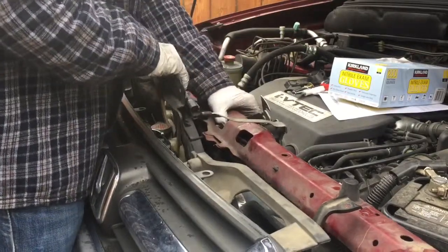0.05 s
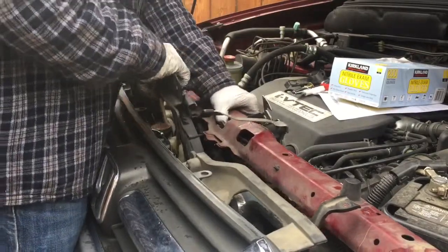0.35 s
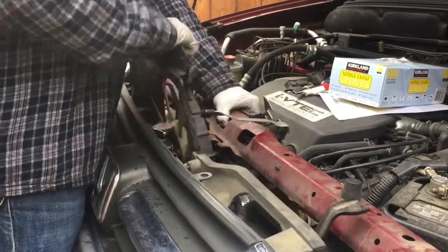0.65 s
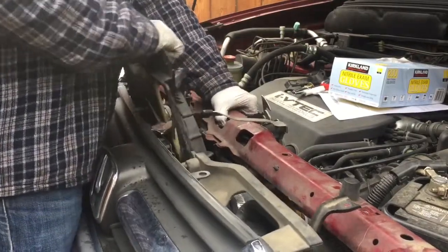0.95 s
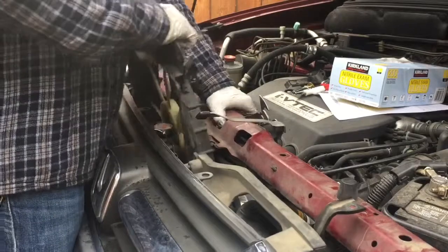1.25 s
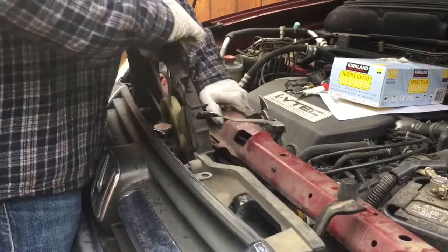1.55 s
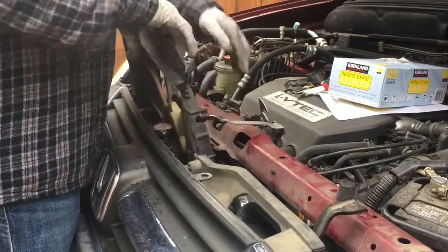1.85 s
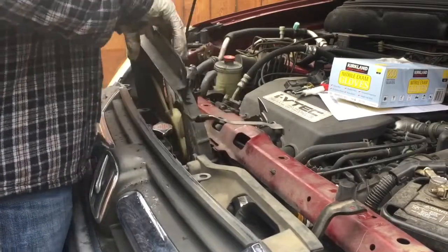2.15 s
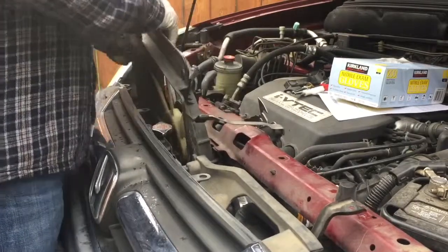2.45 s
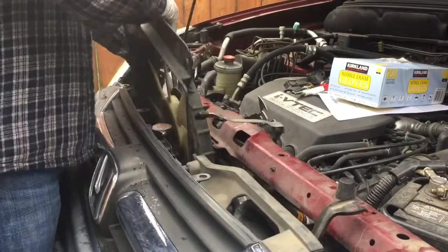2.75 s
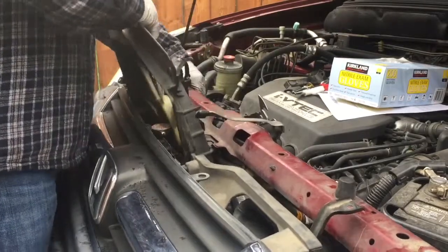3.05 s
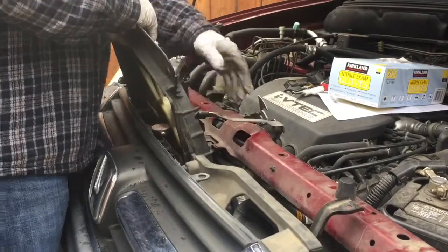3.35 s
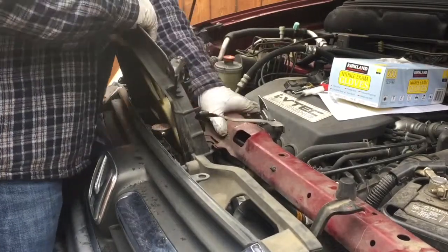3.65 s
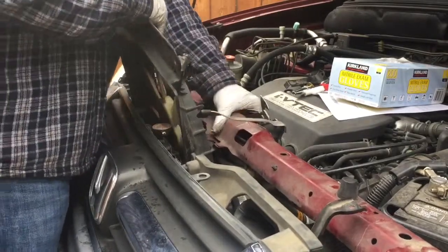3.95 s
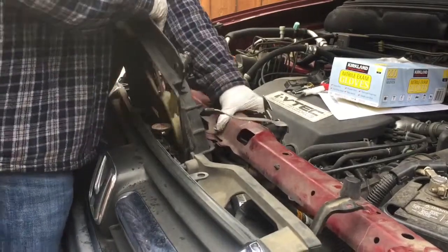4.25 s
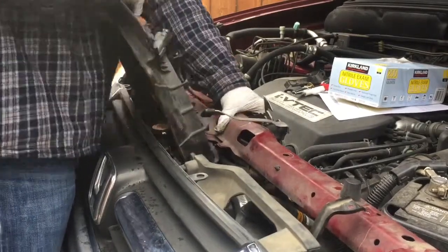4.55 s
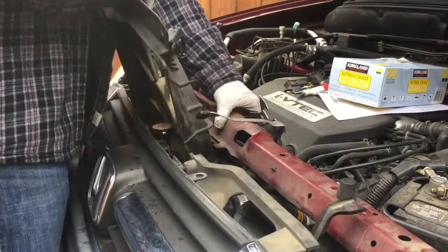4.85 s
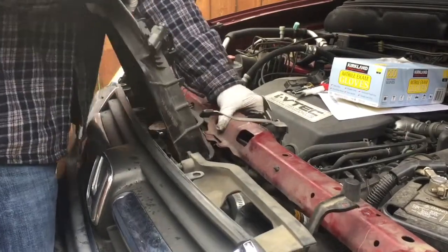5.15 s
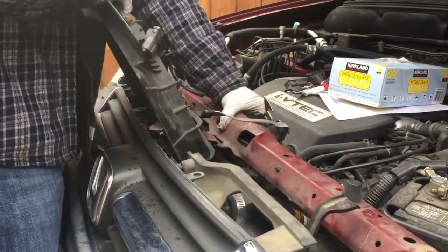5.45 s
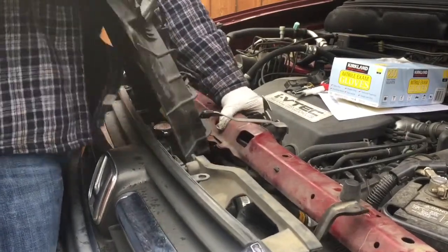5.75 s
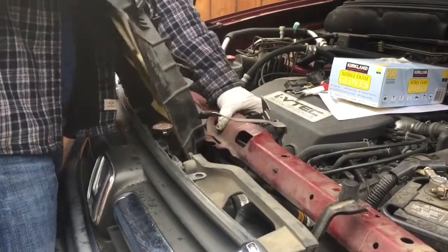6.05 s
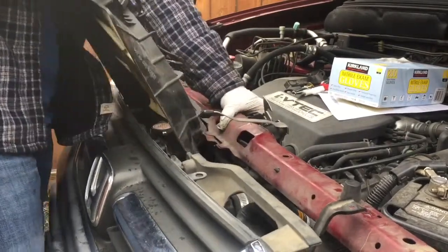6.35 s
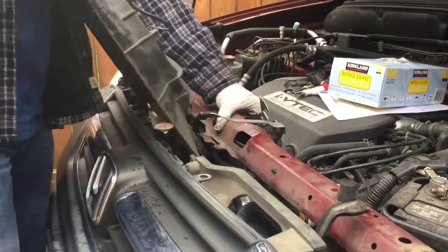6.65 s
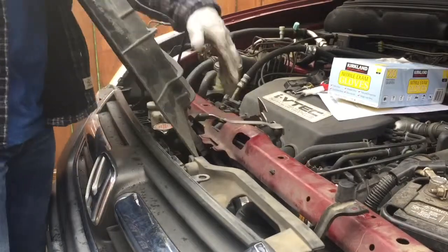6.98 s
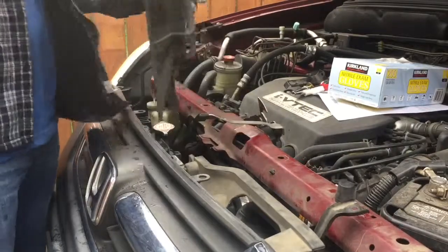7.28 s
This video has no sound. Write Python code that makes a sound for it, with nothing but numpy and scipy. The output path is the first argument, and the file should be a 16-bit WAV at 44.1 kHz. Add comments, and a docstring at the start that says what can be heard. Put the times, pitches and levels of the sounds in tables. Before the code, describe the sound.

A plastic fan shroud scrapes and knocks against metal in short bursts as it is worked out of a car's engine bay.

```python
"""Short scrapes and knocks of plastic on metal in a quiet garage: a fan shroud is worked side to side
and up out of a car's engine bay. Its edge sticks and slips in strokes and hits the metal around it.
The big panel booms after each shove, and a thin metal part rings when it is brushed.
Sleeves and gloves rustle over a faint room rumble."""
import sys
import numpy as np
from scipy import signal
from scipy.fft import rfft, irfft, next_fast_len
from scipy.io import wavfile
from scipy.ndimage import uniform_filter1d, map_coordinates

SR = 44100
rng = np.random.default_rng(int(sys.argv[2]) if len(sys.argv) > 2 else 0)


def wav_record(signal):
    """Record a signal, one row per channel, as 16-bit PCM in the file named by sys.argv[1]."""
    frames = np.transpose(np.atleast_2d(signal))
    bounded = np.clip(frames, -1, 1)
    # unit amplitude maps onto the largest positive 16-bit level
    quanta = np.round(bounded * 32767).astype(np.int16)
    wavfile.write(sys.argv[1], SR, quanta)


N = 327132
TIME_S = np.arange(N) / SR
AGE_S = np.arange(SR // 2) / SR  # time within one event
TOP_HZ = 16200
MID_HZ = 1510  # pitch of an average spot on the shroud

# Panel boom. Each row: frequency in Hz, relative level in dB.
PANEL_SPECTRUM = [(35, -38), (60, -19), (110, -1), (200, 0.5), (300, -4), (450, -3.5), (700, -13.5),
                  (1400, -50), (4000, -48)]
# Contact ticks and grit. Each row: frequency in Hz, relative level in dB.
TICK_SPECTRUM = [(1500, -26.5), (3500, 2.5), (6000, 0), (9300, -0.5), (10500, -2), (12000, 1), (16000, -15)]


def stroke_forces(push_power=1.94, grit_power=0.99, panel_lag_s=0.018):
    """Each shove builds, holds and dies away. Returns the drives of scrape, grit and lagging panel."""
    # Each row: start, attack, hold and release t60 in seconds, scrape drive in dB,
    # grit and boom drives in dB re the scrape drive.
    strokes = [(0.137, 0.018, 0.022, 0.19, -36.5, -9, -2.5), (0.395, 0.066, 0.058, 0.088, -50.5, -7.5, 1.5),
               (0.636, 0.087, 0.018, 0.18, -31, -8, -7), (1.016, 0.04, 0.027, 0.24, -27.5, -12.5, -11.5),
               (1.169, 0.048, 0.018, 0.364, -42, -5.5, -1), (1.348, 0.012, 0.053, 0.1, -50, -13.5, 4),
               (1.663, 0.013, 0.076, 0.084, -51.5, -7, -0.5), (1.867, 0.042, 0.0076, 0.16, -47, -15, -0.5),
               (2.019, 0.028, 0.007, 0.047, -46, -9, 3.5), (2.775, 0.076, 0.037, 0.11, -28, -6.5, -9.5),
               (3.105, 0.032, 0.13, 0.16, -65.5, -2, -3.5), (4.057, 0.033, 0.0082, 0.047, -42, -9, -4.5),
               (4.212, 0.016, 0.0057, 0.056, -41.5, -2.5, -5.5),
               (4.459, 0.03, 0.017, 0.088, -45, -37.5, -3), (4.519, 0.015, 0.046, 0.384, -30.5, -9, -6),
               (4.985, 0.043, 0.112, .2, -44, -11, -6), (5.677, .02, 0.027, .1, -34.5, -5, 1),
               (5.726, 0.014, 0.024, .27, -29.5, -6.5, -6), (5.909, 0.039, 0.029, 0.5, -45, -4, 0),
               (6.235, 0.078, 0.017, 0.18, -40, -3.5, -4.5), (6.446, 0.041, 0.035, 0.33, -39.5, -6.5, 0.5),
               (6.829, 0.018, 0.0044, .25, -47, -4, -4.5), (7.065, 0.062, 0.011, 0.42, -55, -17, -8)]
    scrape, grit, boom = np.zeros((3, N))
    for start_s, attack_s, hold_s, release_s, db, grit_db, boom_db in strokes:
        t = TIME_S - start_s
        build = np.clip(t / attack_s, 0, 1) ** push_power
        force = build * np.exp(-np.log(1000) * np.maximum(t - attack_s - hold_s, 0) / release_s)
        scrape += amp(db) * force
        grit += amp(db + grit_db) * force ** grit_power
        boom += amp(db + boom_db) * force
    pole = np.exp(-1 / (panel_lag_s * SR))
    return scrape, grit, signal.lfilter([1 - pole], [1, -pole], boom)


def scrapes(scrape, grit, boom):
    """The edge judders over metal: coarse slips in the plastic, fine grit on top, the panel below."""
    catches = judder(rate_hz=130, depth_db=4.6)
    coarse = slips(per_s=3000, pitch_hz=1535, spread=0.2506, decay_cycles=3.7, scatter_db=11.5)
    coarse = wander(coarse, depth_db=3)
    fine = slips(per_s=3000, pitch_hz=6360, spread=0.62, decay_cycles=0.24, scatter_db=8.5)
    fine = wander(coloured(fine, TICK_SPECTRUM), depth_db=3.5)
    panel = wander(coloured(rng.standard_normal(N), PANEL_SPECTRUM), depth_db=3.5, bins=3)
    return catches * (amp(3) * scrape * coarse + amp(0.5) * grit * fine) + amp(0.5) * boom * panel


def slips(per_s, pitch_hz, spread, decay_cycles, scatter_db):
    """Stick-slip at rms 1: irregular tiny jolts, each a damped sine of its own pitch and size."""
    count = int(per_s * N / SR)
    when, pitch, size = np.random.default_rng(rng.integers(2 ** 31)).random((count, 3)).T
    log_offset = spread * np.log(pitch / (1 - pitch))
    hz = np.clip(pitch_hz * np.exp(log_offset), 300, TOP_HZ)[:, None]
    t = AGE_S[:SR // 100]
    gain = amp(scatter_db * size)[:, None] * np.sqrt(hz)
    jolts = gain * np.sin(2 * np.pi * hz * t) * np.exp(-hz * t / decay_cycles)
    index = (when * N).astype(int)[:, None] + np.arange(len(t))
    return unit(np.bincount(index.ravel(), jolts.ravel(), N)[:N])


def judder(rate_hz, depth_db):
    """The edge catches and lets go at an uneven pace: a peaky gain of rms 1."""
    knots = rng.standard_normal(int(N * rate_hz / SR) + 4)
    return unit(amp(depth_db * np.tanh(map_coordinates(knots, [TIME_S * rate_hz]))))


def wander(x, depth_db, bins=5, frames=16):
    """The contact point wanders, so different resonances stand out from moment to moment."""
    spectra = signal.stft(x, nperseg=1024)[2]
    field = uniform_filter1d(rng.standard_normal(spectra.shape), bins, axis=0)
    field = uniform_filter1d(field, frames, axis=1)
    return unit(signal.istft(spectra * amp(depth_db * unit(field)), nperseg=1024)[1][:N])


def knocks(scrape, rattle_tries_per_s=22, rattle_db=-12.5):
    """The shroud hits metal at a different spot each time, and rattles by chance while it scrapes."""
    # Each row: start in seconds, strength in dB, pitch in Hz, spread in octaves, tick sharpness in dB.
    blows = [(0.0034, -34, 3440, 0.27, -10), (0.15, -32, 2925, 0.093, -8.5), (0.1654, -33, 2920, .47, -15),
             (0.4287, -46, 2420, 0.37, -42), (0.3283, -58.5, 1070, 0.4, -31), (0.523, -44, 1523, 0.41, -34),
             (0.6749, -36, 1930, 1.14, -29), (0.7134, -33, 2020, 1.2, -18), (0.728, -41, 1840, 1, -12),
             (0.7801, -39, 2620, 0.83, -10), (1.0357, -31, 1280, 0.57, -31.5),
             (1.047, -25.5, 1794, 0.43, -19), (1.072, -24.5, 1700, 0.41, -15.5),
             (1.1912, -42.5, 3000, 0.73, -12), (1.201, -36.5, 2120, 0.48, -34),
             (1.216, -29.5, 857, 0.44, -42), (1.3449, -41.5, 710, 0.63, -44),
             (1.3652, -38.5, 1640, 0.25, -34), (1.4093, -43, 1010, 0.48, -13),
             (1.4644, -48, 1290, 0.36, -45), (1.554, -40.5, 1820, 0.37, -20.5),
             (1.691, -39.5, 577, 0.1, -21), (1.7147, -41, 1580, 0.29, -29), (1.7655, -45, 3970, 0.8, -6),
             (1.8762, -55, 3460, 1.8, 1.5), (2.026, -48.5, 795, 0.18, -35), (2.0443, -44.5, 960, 0.67, -35),
             (2.5737, -35, 2560, 0.41, -9), (2.5964, -43, 2460, 0.44, -34), (2.8187, -39, 2220, .94, -6),
             (2.8476, -25, 1512, 0.41, -22), (2.8694, -33, 1816, 0.33, -3.5), (3.13, -56, 1380, 0.53, -25),
             (3.2596, -53.5, 3080, 0.18, -18), (4.2374, -38.5, 2850, 0.84, -23),
             (4.2951, -61.5, 4400, 1.2, 7.5), (4.434, -48.5, 920, 0.53, -55), (4.5269, -20, 1590, 0.46, -9),
             (4.549, -34.5, 2110, 1.3, -11), (4.578, -32, 3380, .65, -9), (4.647, -32, 2700, 1.46, -9),
             (4.7084, -38, 1180, 0.66, -21), (4.802, -53.5, 1090, 0.76, -25), (4.933, -57, 2020, 0.21, -10),
             (4.972, -54.5, 1346, 0.32, -33), (5.0205, -38.5, 1610, 0.65, -25), (5.096, -32, 2380, 0.24, 0),
             (5.1019, -27.5, 1774, 0.46, -35), (5.4885, -45.5, 2660, 0.91, -7),
             (5.6885, -43.5, 3290, 1.1, 3.5), (5.7366, -26, 2620, 1.2, -4.5),
             (5.7569, -30.5, 1646, 1.3, -19), (5.9626, -33, 1266, 0.36, -13.5),
             (5.997, -32, 1413, 0.93, -20), (6.2705, -44, 1792, 0.57, -26),
             (6.3434, -35.5, 1350, 0.95, -35), (6.5, -36.5, 1695, 0.14, -24),
             (6.5373, -33, 3300, 0.52, -12), (6.6281, -22, 1510, 0.71, -13.5),
             (6.651, -39.5, 2180, 0.7, -31), (6.8529, -42, 1500, 0.42, -12.5),
             (7.2114, -37, 1530, 0.53, -9), (7.2329, -45, 1980, 0.82, -23),
             (7.3119, -50.5, 1080, 0.23, -42)]
    track = np.zeros(N)
    for start_s, *blow in blows:
        add(track, start_s, knock(*blow))
    for when, spot in rng.random((int(rattle_tries_per_s * N / SR), 2)):
        force = scrape[int(when * N)]
        if force > amp(-60):
            pitch_hz = MID_HZ * 2 ** (2 * spot - 1)  # within an octave either way
            rattle = knock(20 * np.log10(force) + rattle_db, pitch_hz, spread_oct=0.92, tick_db=-49)
            add(track, when * N / SR, rattle)
    return track


def knock(db, pitch_hz, spread_oct, tick_db, ripple_db=4, spacing_hz=130, heavy_db=-32):
    """One blow: crowded, quickly damped plastic modes, a contact tick, then the slower panel."""
    mode_noise, tick_noise, panel_noise, bumps = rng.standard_normal((4, len(AGE_S)))

    def spot_response(hz):
        """A band around the pitch; each spot favours its own few resonances."""
        band = (1 + (np.log2((hz + 1) / pitch_hz) / (2.58 * spread_oct)) ** 2) ** -2
        ripple = np.tanh(np.interp(hz / spacing_hz, np.arange(len(bumps)), bumps))
        return band / np.sqrt(hz + 200) * amp(ripple_db * ripple)

    modes = filtered(mode_noise, spot_response) * fade(t60_s=0.047)
    modes /= np.std(modes[:SR // 100])
    tick = amp(tick_db + 13) * coloured(tick_noise, TICK_SPECTRUM) * fade(t60_s=0.019)
    # stiff, high-pitched spots flex the panel less, heavy blows more
    boom_db = -10.5 - 9 * np.log2(pitch_hz / MID_HZ) + 0.2 * (db - heavy_db)
    panel = amp(boom_db) * coloured(panel_noise, PANEL_SPECTRUM) * fade(t60_s=0.13) * rise(tau_s=0.013)
    contact_s = 0.00035 * amp(-0.26 * tick_db)  # the duller the tick, the longer the contact
    onset = rise(contact_s) * (1 + contact_s / 0.0028)
    return amp(db + 2) * ((modes + tick) * onset + panel)


def thuds():
    """Heavy shoves flex the whole shroud: a deep, short shudder."""
    # Each row: start in seconds, level in dB before the envelope, pitch in Hz.
    shoves = [(2.866, -32, 272), (4.552, -36.5, 90), (5.742, -37, 300)]
    track = np.zeros(N)
    for start_s, db, pitch_hz in shoves:
        noise = rng.standard_normal(len(AGE_S))
        shudder = unit(filtered(noise, lambda hz: hz ** 2 / (1 + (hz / pitch_hz) ** 6)))
        add(track, start_s, amp(db) * shudder * fade(t60_s=0.25) * rise(tau_s=0.0053))
    return track


def shroud_in_bay(x):
    """The shroud's broad resonances and the engine bay colour the plastic's sound, and everything below about
    55 Hz falls away steeply."""
    # Each row: centre in Hz, width in Hz, gain in dB re the direct path.
    resonances = [(237, 109, -3.5), (1314, 68, -3), (1543, 64, -3)]
    # Each row: frequency in Hz, gain in dB.
    bay_response = [(22, -47), (55, -3), (500, -0.5), (1300, -4), (3000, -3), (9000, -1.5), (10500, -6.5),
                    (16000, -3)]

    def response(hz):
        peaks = sum(amp(db) * 1j * hz * width_hz / (centre_hz ** 2 - hz ** 2 + 1j * hz * width_hz)
                    for centre_hz, width_hz, db in resonances)
        return (1 + peaks) * amp(along(bay_response, hz))

    return filtered(x, response)


def contact_hardness(x, edge_hz=10000):
    """Harder contact puts more into the top octave; it softens as the shroud comes free."""
    # Each row: time in seconds, gain above edge_hz in dB.
    hardness = [(0, 1), (1.2, -0.5), (2.8, -3), (4.5, -0.5), (5.2, 0), (6.2, -10.5), (7.3, -15)]
    top = filtered(x, lambda hz: 1 - 1 / (1 + (hz / edge_hz) ** 10))
    top_gain = amp(np.interp(TIME_S, *np.transpose(hardness)))
    return x + (top_gain - 1) * top


def metal_ring(rub_top_hz=11100, tilt_db_per_oct=-0.5):
    """A brief gritty rub is heard and rings the thin metal part, at new mode strengths each time."""
    # Each row: start in seconds, strength in dB, length in seconds.
    touches = [(0.197, -31, 0.04), (1.284, -31.5, 0.026), (1.721, -37.5, 0.07), (1.9376, -35.5, 0.017),
               (2.054, -36, 0.02), (4.686, -32, 0.02), (4.824, -39, 0.026), (5.153, -30, 0.02),
               (5.534, -46, 0.0069), (5.703, -33, 0.027), (5.95, -28, 0.034), (6.095, -43, 0.0045),
               (6.293, -28.5, 0.044), (6.464, -24.5, 0.046), (6.517, -50, 0.031)]
    # Each row: frequency in Hz, relative level in dB, t60 in seconds.
    modes = [(2020, 0, .16), (2085, -4, .12), (2850, -6, .1), (4059, -8, .05), (4600, -9, .05),
             (5560, -7, .04), (5959, -5, .1), (7009, -3, .07), (8100, -8, .03), (9480, -11, .05)]
    track = np.zeros(N)
    for start_s, db, length_s in touches:
        rub = rng.standard_normal(len(AGE_S)) * np.exp(-(AGE_S / length_s) ** 2)
        scuff = filtered(rub * rise(tau_s=0.005), lambda hz: 1 / (1 + (hz / rub_top_hz) ** 4))
        add(track, start_s, amp(db - 18) * scuff)
        for hz, mode_db, t60_s in modes:
            ring = signal.fftconvolve(rub, fade(t60_s) * np.sin(2 * np.pi * hz * AGE_S))[:len(AGE_S)]
            tilt_db = tilt_db_per_oct * np.log2(hz / modes[0][0])  # soft plastic drives high modes less
            add(track, start_s, amp(db + mode_db + tilt_db + rng.normal(0, 2) - 34) * unit(ring))
    return track


def garage_echo(x, patterns=24):
    """Short diffuse echo of bay, bonnet and walls; its pattern changes as the shroud moves."""
    # Each row: frequency in Hz, t60 in seconds.
    decay_times = [(100, 0.5), (300, 0.32), (1000, 0.21), (3000, 0.14), (7000, 0.093), (15000, 0.11)]
    wet = np.zeros(N)
    for span in np.array_split(np.arange(N), patterns):
        hz, t, spectra = signal.stft(rng.standard_normal(len(AGE_S)), SR, nperseg=256)
        decay = np.exp(-np.log(1000) * t / along(decay_times, hz)[:, None])
        tail = signal.istft(spectra * decay, SR, nperseg=256)[1][:len(AGE_S)] * rise(tau_s=0.00098)
        add(wet, span[0] / SR, signal.fftconvolve(x[span], tail / np.linalg.norm(tail)))
    return wet


def cloth_rustle():
    """Sleeves and gloves brush in tiny slips as the arms move."""
    # Each row: centre in seconds, peak level in dB, half-width in seconds.
    brushes = [(2.42, -75.5, 0.29), (3.228, -69, 0.03), (3.59, -74, 0.087), (3.801, -55, 0.014),
               (3.892, -68.5, 0.041)]
    # Each row: frequency in Hz, relative level in dB.
    cloth_spectrum = [(500, -33), (2500, -5), (8000, 8), (11000, 8), (16000, 8)]
    fibres = slips(per_s=1200, pitch_hz=5600, spread=0.3, decay_cycles=0.86, scatter_db=20)
    envelope = sum(amp(db) * np.exp(-((TIME_S - at_s) / half_s) ** 2) for at_s, db, half_s in brushes)
    return envelope * coloured(fibres, cloth_spectrum)


def room_rumble():
    """Steady low rumble with faint hiss."""
    # Each row: frequency in Hz, relative level in dB.
    air_spectrum = [(15, -55.5), (25, -39), (42, -19), (64, -0.5), (114, -14), (153, -13), (503, -21),
                    (659, -19.5), (775, -22), (988, -17.5), (1400, -23.5), (4030, -31), (5880, -33.5),
                    (14400, -40), (16000, -43)]
    return amp(-61.5) * coloured(rng.standard_normal(N), air_spectrum)


def amp(db):
    """Decibels to gain."""
    return 10 ** (np.asarray(db) / 20)


def unit(x):
    """Scale to rms 1."""
    return x / np.sqrt(np.mean(x ** 2) + 1e-20)


def along(points, hz):
    """Interpolate (Hz, value) points on a log frequency axis."""
    points_hz, values = np.transpose(points)
    return np.interp(np.log(hz + 1), np.log(points_hz + 1), values)


def filtered(x, response):
    """Filter x by a gain function of Hz."""
    size = next_fast_len(len(x) + 8192)
    return irfft(rfft(x, size) * response(np.fft.rfftfreq(size, 1 / SR)), size)[:len(x)]


def coloured(x, spectrum):
    """Shape x by (Hz, dB) points, at rms 1."""
    return unit(filtered(x, lambda hz: amp(along(spectrum, hz))))


def rise(tau_s):
    """Exponential onset from 0 towards 1."""
    return 1 - np.exp(-AGE_S / tau_s)


def fade(t60_s):
    """Exponential decay from 1."""
    return np.exp(-np.log(1000) * AGE_S / t60_s)


def add(track, start_s, sound):
    """Mix a sound into the track."""
    part = track[max(round(start_s * SR), 0):][:len(sound)]
    part += sound[:len(part)]


def scene():
    """Plastic and metal contacts, their echo and the background, in mono."""
    scrape, grit, boom = stroke_forces()
    background = room_rumble() + cloth_rustle()
    metal = metal_ring()
    plastic = scrapes(scrape, grit, boom) + thuds() + knocks(scrape)
    contacts = contact_hardness(shroud_in_bay(plastic)) + metal
    return (contacts + amp(-11.5) * garage_echo(contacts) + background)[None]


def record(dry):
    """Steep low-pass at TOP_HZ."""
    return np.array([filtered(x, lambda hz: 1 / (1 + (hz / TOP_HZ) ** 160)) for x in dry])


dry = scene()
out = record(dry)
wav_record(out)
```